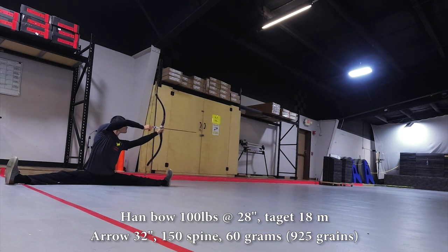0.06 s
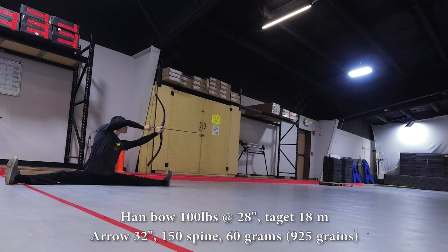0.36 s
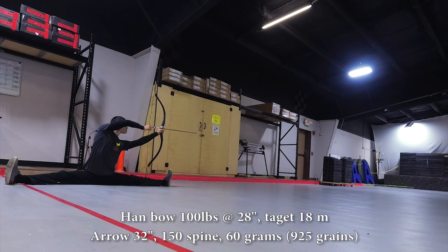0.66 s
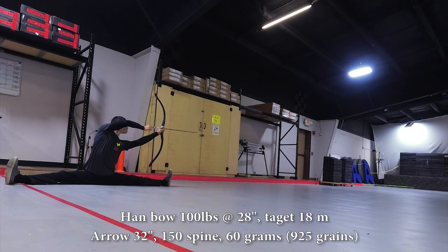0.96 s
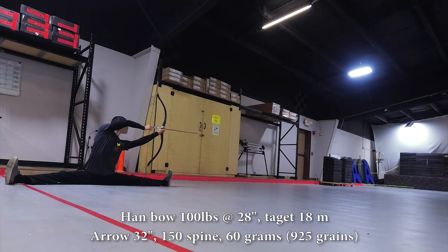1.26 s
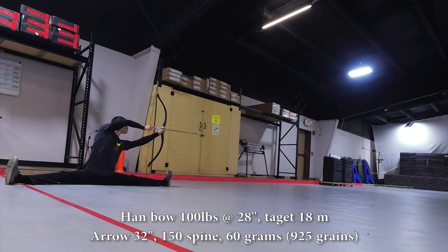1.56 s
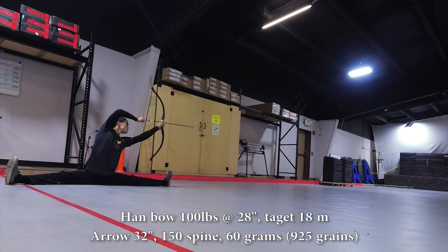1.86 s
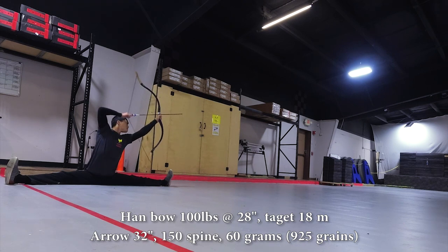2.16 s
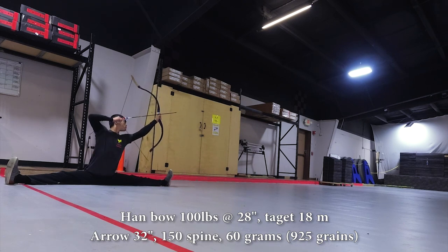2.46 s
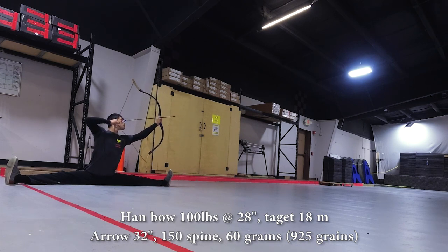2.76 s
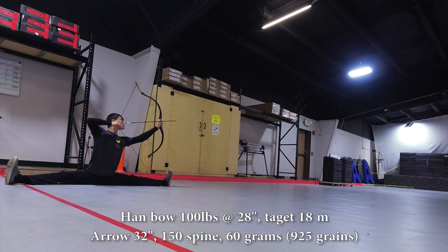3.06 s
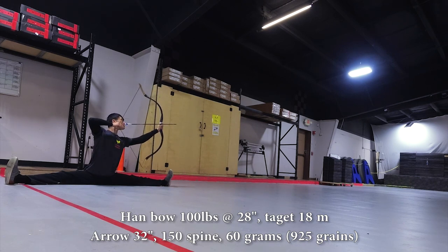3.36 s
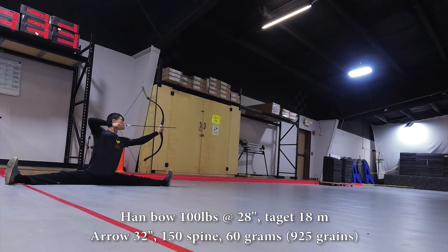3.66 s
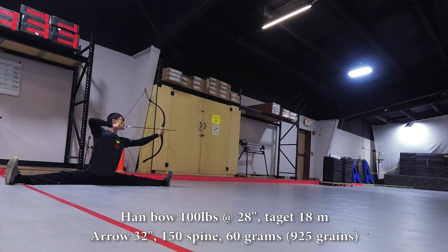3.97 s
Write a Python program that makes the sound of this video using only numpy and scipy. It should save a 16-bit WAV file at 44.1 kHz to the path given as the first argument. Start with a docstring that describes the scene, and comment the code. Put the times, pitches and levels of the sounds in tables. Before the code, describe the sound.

Ventilation rumbles and hums steadily in a large gym hall over thin microphone hiss. Sleeves rustle faintly midway, then something heavy, perhaps a door, bumps and shudders with a short scrape that echoes briefly.

```python
"""A large gym hall. From the start, ventilation drones: air rumbles in the ducts under fan tones
and a swelling hum, with a thin bed of microphone hiss and whine. Around 2 s, sleeves rustle faintly
as an archer raises a bow. Near 3.3 s something heavy, perhaps a door across the hall, bumps and
shudders with a short scraping rush. The hall rings on over the drone."""
import sys
import numpy as np
from scipy import signal
from scipy.fft import irfft
from scipy.io import wavfile
from scipy.ndimage import uniform_filter1d

SR = 44100
rng = np.random.default_rng(int(sys.argv[2]) if len(sys.argv) > 2 else 0)


def pcm_store(signal):
    """Save signal as 16-bit PCM."""
    levels = np.round(np.clip(np.atleast_2d(signal), -1, 1) * 32767)
    wavfile.write(sys.argv[1], SR, levels.astype(np.int16).T)


N = 176400
TIME = np.arange(N) / SR
FREQS = np.fft.rfftfreq(N, 1 / SR)

# Colour of the duct rumble: freq_hz, density_db
RUMBLE_EQ = [(20, -25), (32, -25), (48, -16.5), (75, -9), (100, -2.5), (116, -7), (140, 3), (172, -3),
             (200, -9), (240, -5.5), (315, -9), (370, -17.5), (450, -19.5), (620, -27.5), (1000, -30.5),
             (1600, -40), (3000, -46.5), (7000, -59)]
# Left-right likeness of the moving air: freq_hz, correlation
AIR_STEREO = [(70, .9999), (130, .9988), (175, .996), (230, .988), (300, .98), (420, .945), (600, .87),
              (1000, .8), (1500, .6), (3000, .1)]
# Stereo lean of the noise layers: freq_hz, left_minus_right_db
BALANCE = [(20, 0), (200, 0), (400, .5), (700, 1), (1250, 1.5), (2300, -1.5), (4400, -1.7), (8000, -.8)]
# Duct resonances, ahead of the draught's fader and roll-off: pitch_hz, width_hz, level_db
DUCT_TONES = [(147, 24.4, -49), (168.8, 6.8, -53.5), (406.5, 7.6, -66)]
# Fader ride of the draught in the ducts: time_s, gain_db
DRAUGHT_RIDE = [(0, 0.5), (.4, 1), (.7, -1), (1.1, 0), (1.6, 0.5), (2.05, -2), (2.3, 2.5), (2.7, 0),
                (2.95, 0.5), (3.25, -0.5), (3.6, 2), (4, 1.5)]
# Swells of the hum: time_s, level_db
HUM_RIDE = [(0, -52), (.9, -55), (1.1, -42.5), (1.38, -57.5), (1.6, -47.5), (2.0, -55), (2.55, -52.5),
            (2.85, -45.5), (3.15, -52.5), (4, -54.5)]
# Steady fan tones: pitch_hz, level_db
FAN_TONES = [(841, -74), (1021, -77.5), (1081, -79), (1380, -81.5), (1980, -83), (2700, -80.5)]
# Colour of the microphone hiss: freq_hz, density_db
HISS_EQ = [(100, -3), (2500, 1.5), (6000, -1), (7200, -0.5), (7900, 1), (9200, -0.5), (15500, 2)]
# Left-right likeness of the hiss: freq_hz, correlation
HISS_STEREO = [(100, 0.9), (1000, 0.11), (4000, 0.28), (6500, 0.71), (8000, 0.59), (10000, 0.64),
               (15000, 0.42)]
# Colour of sliding cloth: freq_hz, density_db
SLEEVE_EQ = [(200, 1), (550, 9), (1000, 7), (1600, -6), (3000, -4), (4200, -4), (5000, -3), (6500, -7.5),
             (9000, -15), (14000, -19)]
# Left-right likeness of sleeves, thuds and scrapes in the hall: freq_hz, correlation
HALL_STEREO = [(60, .9999), (130, .9985), (220, .998), (320, .993), (600, .965), (900, .9), (1400, .5),
               (3000, .1), (15000, .3)]
# Hits of the shuddering door: start_s, gain_db, rise_s
BUMPS = [(3.265, -29, 0.037), (3.342, -30.5, 0.0072), (3.392, -32, 0.0039), (3.456, -34, .006),
         (3.526, -43.5, 0.0048)]
# Colour of each thud: freq_hz, density_db
BUMP_EQ = [(30, -43), (70, -17), (120, -7.5), (180, -1), (235, 0), (300, 3), (370, 0), (450, -5.5),
           (560, -6.5), (820, -9), (1050, -13), (1380, -17.5), (1650, -27), (2400, -34), (4000, -37.5),
           (9000, -50)]
# Ring of the door panel: pitch_hz, gain_db, t60_s
DOOR_MODES = [(183.7, -7, 0.92), (278, -7.5, 0.32), (314.6, -0.5, .55), (362, -8, .35), (624, -16.5, 1),
              (808, -11.5, 0.61)]
# Reverb tail of the hall: freq_hz, t60_s
HALL_T60 = [(100, 0.75), (300, 0.99), (700, 1.16), (1500, 1.29), (4000, 1.53), (10000, 0.44)]
# Strokes of the scraping rush: start_s, rise_s, hold_s, level_db
SCRAPES = [(3.284, 0.034, 0.023, -49.5), (3.34, .065, 0.054, -43.5), (3.646, 0.034, .01, -60)]
# Colour of a scrape: freq_hz, density_db
SCRAPE_EQ = [(200, -1), (700, 8.5), (1300, 7.5), (1700, -2.5), (2300, 5.5), (2900, -1.5), (3800, -1),
             (5500, -8.5), (8000, -14), (14000, -31)]


def amp(db):
    """Decibels to gain."""
    return 10 ** (np.asarray(db) / 20)


def unit_rms(x):
    """Scales to rms 1."""
    return x / np.sqrt(np.mean(x ** 2) + 1e-20)


def curve_at(points, hz):
    """Reads a curve on a log-frequency axis."""
    freqs, values = np.transpose(points)
    return np.interp(np.log(hz + 1), np.log(freqs + 1), values)


def stereo_noise(eq, stereo=HALL_STEREO):
    """Coloured mid-side noise of rms 1, its width set band by band."""
    a, b, c, d = rng.standard_normal((4, len(FREQS)))
    likeness = np.clip(curve_at(stereo, FREQS), -1, 1)
    mid = np.sqrt(1 + likeness) * (a + 1j * b)
    side = np.sqrt(1 - likeness) * (c + 1j * d)
    lean_db = curve_at(BALANCE, FREQS) / 2
    gain = amp(curve_at(eq, FREQS) + np.array([lean_db, -lean_db]))
    return unit_rms(irfft(np.array([mid + side, mid - side]) * gain, N))


def narrow_band(hz, width_hz):
    """A narrow band of noise: the tighter it is, the more like a wavering tone."""
    a, b = rng.standard_normal((2, len(FREQS)))
    return unit_rms(irfft((a + 1j * b) / (1 + (2 * (FREQS - hz) / width_hz) ** 4) ** .5, N))


def drifting_tone(hz, wander_hz=1.38):
    """A tone of even strength whose pitch wanders a little."""
    drift = wander_hz * unit_rms(uniform_filter1d(rng.standard_normal(N), size=4000))
    return np.sqrt(2) * np.sin(2 * np.pi * np.cumsum(hz + drift) / SR)


def moving_eq(x, gain_db, size=512):
    """Applies a gain that varies with frequency and time."""
    frames = dict(fs=SR, nperseg=size, noverlap=size * 3 // 4)
    hz, t, spectrum = signal.stft(x, **frames)
    return signal.istft(spectrum * amp(gain_db(hz[:, None], t)), **frames)[1][:, :N]


def turbulence_db(hz, t, patch_db=1.5, swell_db=0.33):
    """Churning air: random patches across the spectrum on a slight overall swell."""
    patches = uniform_filter1d(rng.standard_normal((len(hz), len(t))), size=8, axis=0)
    patches = uniform_filter1d(patches, size=10, axis=1)
    swell = uniform_filter1d(rng.standard_normal(len(t)), size=8)
    return patch_db * unit_rms(patches) + swell_db * unit_rms(swell)


def draught_db(hz, t, corner_hz=600):
    """The draught rides the low end up and down and barely moves the treble."""
    return np.interp(t, *np.transpose(DRAUGHT_RIDE)) / (1 + (hz / corner_hz) ** 2)


def ventilation():
    """Air rumbles unevenly in resonant ducts, under fan tones and a hum that swells and sinks."""
    rumble = moving_eq(stereo_noise(RUMBLE_EQ, AIR_STEREO), turbulence_db, size=2048)
    ducts = sum(amp(db) * narrow_band(hz, width) for hz, width, db in DUCT_TONES)
    air = moving_eq(amp(-41.5) * unit_rms(rumble) + ducts, draught_db)
    hum = amp(np.interp(TIME, *np.transpose(HUM_RIDE))) * drifting_tone(hz=284.5)
    fans = sum(amp(db) * drifting_tone(hz) for hz, db in FAN_TONES)
    return air + hum + fans


def electronics():
    """Microphone hiss, with a thin electrical whine and fizz in opposite polarity left and right."""
    whine = amp([[-74], [-66]]) * drifting_tone(hz=15704)  # louder on the right
    fizz = amp(-75) * narrow_band(hz=11510, width_hz=300)
    hiss = amp(-59.5) * stereo_noise(HISS_EQ, HISS_STEREO)
    return hiss + np.array([[1], [-1]]) * (whine + fizz)


def sleeves(peak_s=2.03, half_width_s=.18, peak_db=-55.5):
    """Cloth slides in one soft swish as the arm swings overhead."""
    return amp(peak_db) * stereo_noise(SLEEVE_EQ) / (1 + ((TIME - peak_s) / half_width_s) ** 2)


def hall_tail(x, start_s):
    """From start_s on, each band dies away at the hall's own speed."""
    return moving_eq(x, lambda hz, t: -60 * np.maximum(t - start_s, 0) / curve_at(HALL_T60, hz))


def door_bumps(crossover_hz=500, treble_lag_s=0.012, early_db=5, early_s=0.047):
    """Each bump starts dull, sets the panel ringing and arrives smeared by the hall."""
    lowpass = signal.butter(2, crossover_hz, fs=SR, output="sos")
    out = np.zeros((2, N))
    for start, db, rise in BUMPS:
        age = np.maximum(TIME - start, 0)
        ring = np.zeros(N)
        for hz, mode_db, t60 in DOOR_MODES:
            ring += amp(mode_db - 60 * age / t60) * np.sin(2 * np.pi * (hz * age + rng.random()))
        thud = hall_tail(stereo_noise(BUMP_EQ), start + rise) + ring
        bass = signal.sosfiltfilt(lowpass, thud)
        bass_attack = np.minimum(age / rise, 1)
        treble_attack = np.clip((age - treble_lag_s) / rise, 0, 1)
        lift_db = early_db * np.exp(-age / early_s)  # near reflections add punch
        out += amp(db + lift_db) * (bass_attack * bass + treble_attack * (thud - bass))
    return out


def scraping_rush():
    """Brighter scrapes swell among the bumps, a faint one follows, and each fades in the hall."""
    out = np.zeros((2, N))
    for start, rise, hold, db in SCRAPES:
        attack = np.clip((TIME - start) / rise, 0, 1)
        out += amp(db) * attack * hall_tail(stereo_noise(SCRAPE_EQ), start + rise + hold)
    return out


def scene():
    """The mix: room tone and hiss, then sleeves, then the door and its scrapes."""
    return ventilation() + electronics() + sleeves() + door_bumps() + scraping_rush()


def record(dry):
    """A steep high cut takes off the very top."""
    high_cut = signal.firwin(1023, cutoff=15820, window=("kaiser", 9), fs=SR)
    return signal.oaconvolve(dry, high_cut[None], "same")


dry = scene()
out = record(dry)
pcm_store(out)
```